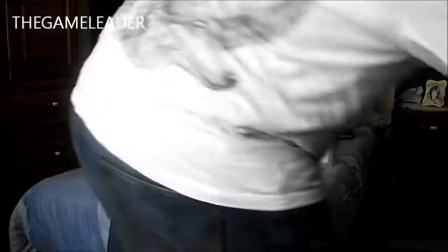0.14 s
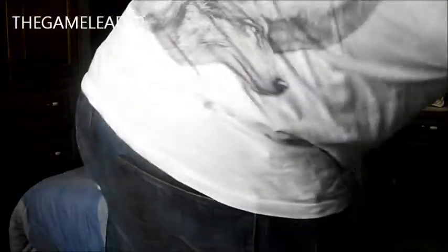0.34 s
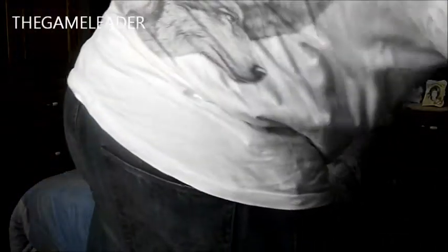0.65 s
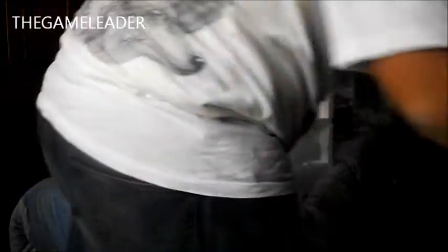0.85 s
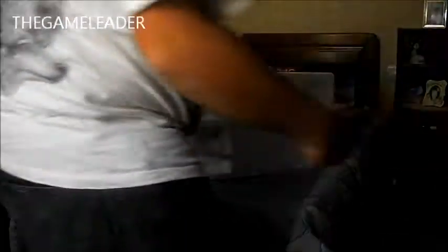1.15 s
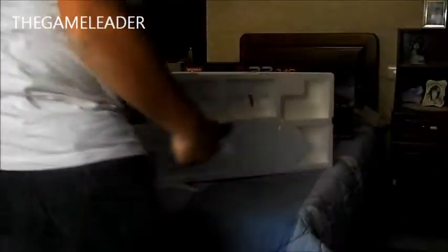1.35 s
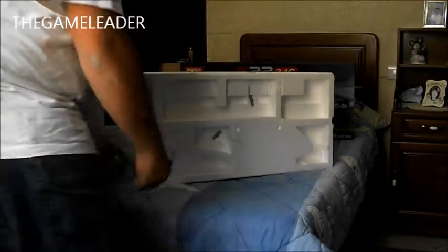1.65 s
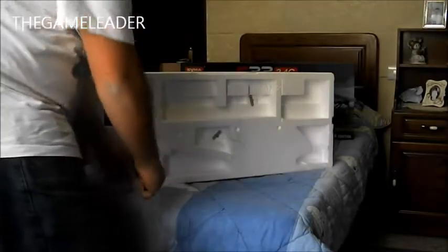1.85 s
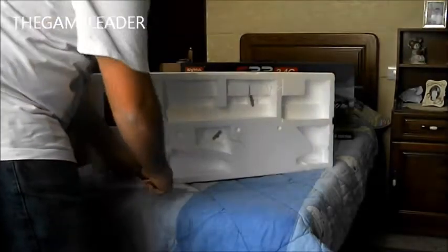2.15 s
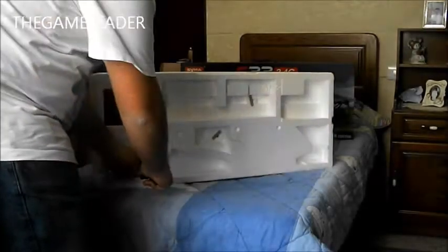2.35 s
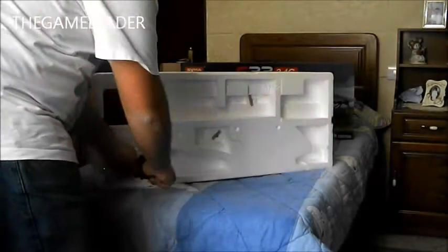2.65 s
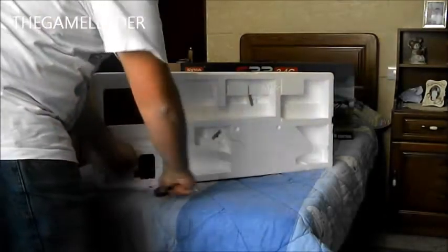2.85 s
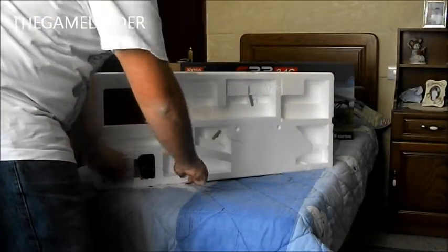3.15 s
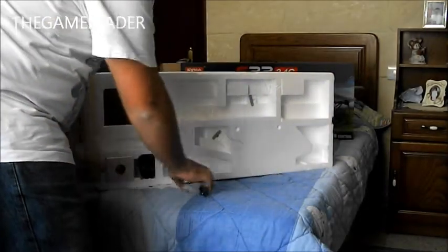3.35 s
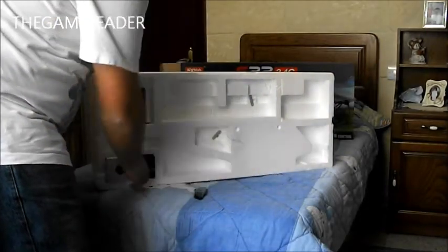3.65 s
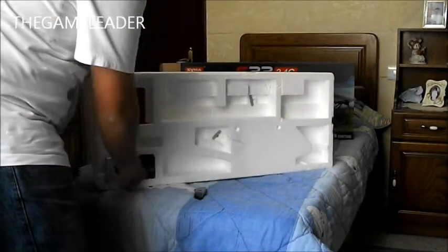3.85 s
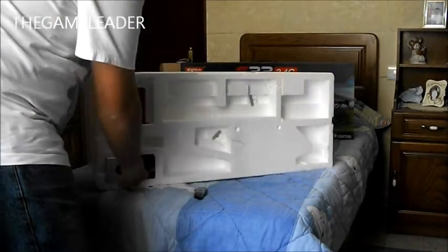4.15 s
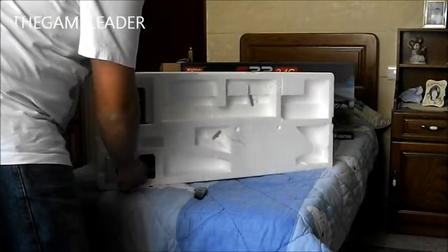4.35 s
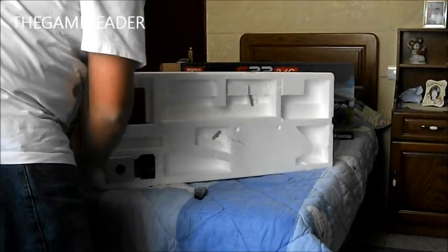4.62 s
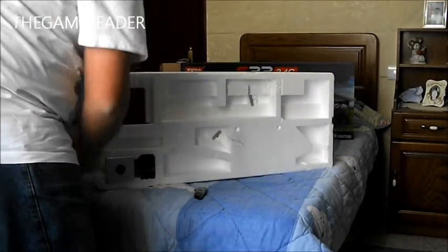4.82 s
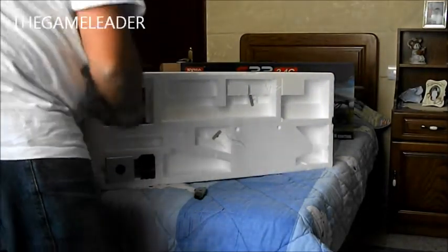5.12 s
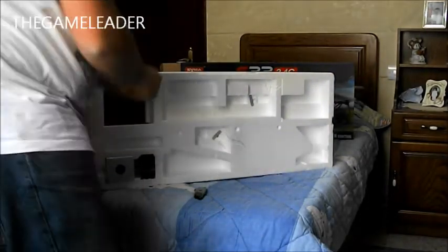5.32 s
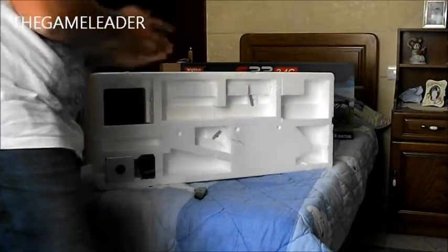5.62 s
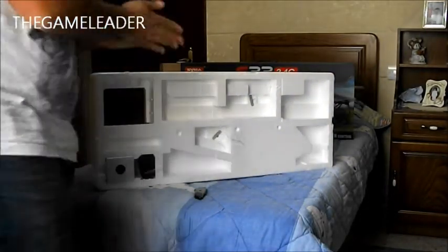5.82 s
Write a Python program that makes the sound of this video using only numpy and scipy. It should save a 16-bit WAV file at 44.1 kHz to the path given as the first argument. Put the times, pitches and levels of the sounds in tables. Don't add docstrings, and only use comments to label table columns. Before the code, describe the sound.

Hard plastic parts clack and ring, foam packaging knocks, squeaks and scrapes, then wrapping crackles in a small hissy bedroom.

```python
import sys
import numpy as np
from scipy import signal
from scipy.fft import rfft, irfft, next_fast_len
from scipy.io import wavfile
from scipy.ndimage import map_coordinates

SR = 44100
rng = np.random.default_rng(int(sys.argv[2]) if len(sys.argv) > 2 else 0)


def natural_amplitude(level_db):
    exponent = np.asarray(level_db, float) / 20
    return 10 ** exponent


def output_pcm(signal):
    pcm = np.clip(np.atleast_2d(signal).T, -1, 1) * 32767
    wavfile.write(sys.argv[1], SR, np.round(pcm).astype(np.int16))


N = 263530
UNEVEN_DB = 1.1


def unit(x):
    return x / np.sqrt(np.mean(x ** 2) + 1e-20)


def peak(x):
    return x / np.abs(x).max()


def noise():
    return rng.standard_normal(N)


def along(points, hz):
    f, v = np.transpose(points)
    return np.interp(np.log(hz + 1), np.log(f + 1), v)


def curves(rows):
    s, *cols = np.transpose(rows)
    return [np.interp(np.arange(N) / SR, s, c) for c in cols]


def wobble(rate):
    knots = rng.standard_normal(int(N * rate / SR) + 4)
    return map_coordinates(knots, [np.arange(N) * rate / SR])


def filtered(x, response):
    m = next_fast_len(len(x) + 4096)
    return irfft(rfft(x, m) * response(np.fft.rfftfreq(m, 1 / SR)), m)[:len(x)]


def band(centre_hz, width_hz):
    return lambda f: 1j * f * width_hz / (centre_hz ** 2 - f * f + 1j * f * width_hz)


def steep(centre_hz, width_hz):
    return lambda f: band(centre_hz, width_hz)(f) ** 2


def modes(table):
    def response(f):
        return sum((-1) ** k * natural_amplitude(db) * band(c, w)(f) for k, (c, w, db) in enumerate(table))
    return response


def add(track, s, x):
    part = track[round(s * SR):][:len(x)]
    part += x[:len(part)]


def burst(t, t60):
    return rng.standard_normal(len(t)) * natural_amplitude(-60 * t / t60)


def shape(s, attack, hold, t60):
    t = (np.arange(N) / SR - s).clip(0)
    return (1 - np.exp(-t / abs(attack))) * natural_amplitude(-60 * (t - hold).clip(0) / abs(t60))


def grains(rate, smooth):
    clicks = rng.random(N) < rate / SR * natural_amplitude(4 * wobble(40))
    return unit(unit(clicks * noise()) + smooth * noise())


# (middle [s], half length [s], sub level [dB], hum level [dB])
SHIFTS = [(0.2, 0.08, -56, -57), (0.41, 0.04, -44, -74), (0.523, 0.27, -80, -51), (1.071, 0.11, -65.5, -44),
          (1.458, 0.0314, -48, -70.5), (1.66, 0.083, -59, -66), (2.258, 0.021, -47, -37),
          (2.873, 0.062, -42, -39), (3.297, 0.046, -37.5, -47), (3.66, 0.16, -47, -57),
          (3.766, 0.03, -56, -40.5), (3.94, 0.035, -55, -73), (4.24, 0.082, -38, -44),
          (4.43, 0.061, -49, -91.5), (4.887, 0.066, -56, -89), (5.317, 0.087, -45, -63),
          (5.51, 0.07, -66, -59), (5.646, 0.091, -70, -52), (5.8, 0.089, -69, -50.5),
          (5.97, 0.034, -48, -36)]
# (frequency [Hz], width [Hz], level [dB])
BOX = [(105, 10.5, 4), (176.2, 28, 1.5), (277, 19.3, 0), (350, 49, -3.5), (527, 173, -4)]


def bed():
    t = np.arange(N) / SR
    sub_gain, hum_gain = natural_amplitude(-58.5), natural_amplitude(-54)
    for s, half, sub_db, hum_db in SHIFTS:
        swell = np.exp(-((t - s) / half) ** 2)
        sub_gain = sub_gain + natural_amplitude(sub_db) * swell
        hum_gain = hum_gain + natural_amplitude(hum_db) * swell
    sub = unit(filtered(noise(), steep(47.3, 19.0)))
    hum = unit(filtered(noise(), lambda f: modes(BOX)(f) * band(105, 90)(f)))
    sub_lumps, hum_lumps = 2 * wobble(14), 2 * wobble(12)
    return natural_amplitude(-4.5 + sub_lumps) * sub_gain * sub + natural_amplitude(-5.5 + hum_lumps) * hum_gain * hum


# (frequency [Hz], level per Hz [dB])
HISS = [(18, -14.5), (33, -24.5), (323, -27), (560, -28.5), (5360, -37), (6530, -36), (7510, -41.5),
        (15500, -44)]
# (frequency [Hz], rms level [dB])
WHINE = [(6783, -60.5), (13593, -65)]


def camera():
    hiss = unit(filtered(noise(), lambda f: natural_amplitude(along(HISS, f))))
    out = natural_amplitude(-52 + 0.34 * wobble(3.55)) * hiss
    t = np.arange(N) / SR
    for hz, db in WHINE:
        gain = np.sqrt(2) * natural_amplitude(db + 0.64 * wobble(90))
        out = out + gain * np.sin(2 * np.pi * hz * t + 2.1 * wobble(30))
    return out


# (time [s], peak [dB], board level [dB], box level [dB], top level [dB])
KNOCKS = [(0.0441, -50, 12, -4, -18), (0.084, -17.5, -11.5, -8, -21), (0.113, -8.5, -30, -40, 0),
          (0.9594, -37, -28, -26, -4.5), (0.9863, -38.5, -4, 9, -7), (2.0489, -31.5, -7.5, -13, -9),
          (2.112, -43.5, 11.5, 14.5, -27), (2.1552, -21, -32, -11, -9), (2.1991, -10, -18, -8.5, -32),
          (2.2192, -8, -3.5, -13.5, -25.5), (2.2274, -10.5, -24, -5, -29), (2.421, -21.5, -27.5, -29, -34),
          (2.5297, -24.5, -2, -45.5, -36.5), (2.8138, -9, 6, -14.5, -18.5), (3.083, -23.5, -8.5, -29, -44),
          (3.7452, -26.5, -14, -5, -32), (4.1874, -34.5, -6, -30.5, -24.5), (4.3343, -41, 1.5, 6.5, -31)]


def knocks():
    out, t = np.zeros(N), np.arange(SR // 6) / SR
    for s, db, board_db, box_db, top_db in KNOCKS:
        snap = peak(filtered(burst(t, .007), lambda f: band(4100, 5200)(f) ** 3))
        board = peak(filtered(burst(t, 0.039), steep(1330, 2650)))
        box = peak(filtered(burst(t, 0.0055), modes(BOX[1:])))
        tick = peak(filtered(burst(t, 0.00107), steep(15000, 7800)))
        body = natural_amplitude(board_db) * board + natural_amplitude(box_db) * box
        add(out, s, natural_amplitude(db) * (snap + body + natural_amplitude(top_db - 31.5) * tick))
    return out


# (time [s], pitch [Hz], level [dB])
SQUEAK = [
    (.102, 4900, -59.5),
    (.1045, 4440, -27.5),
    (.108, 3963, -16),
    (.12, 3906, -19.5),
    (.135, 3795, -22),
    (.157, 4200, -30),
    (.16, 3900, -62),
]


def squeak():
    hz, db = curves(SQUEAK)
    phase = 2 * np.pi * np.cumsum(hz * (1 + 0.052 * wobble(500))) / SR
    tone = np.sin(phase) + natural_amplitude(db + 15.0) * np.sin(2 * phase)
    return natural_amplitude(db + 3.2 * wobble(287.2)) * (db > -59.5) * tone


# (time [s], peak [dB], pitch [Hz], time to fall 60 dB [s])
THUMPS = [
    (0.111, -33, 177, 0.09),
    (0.985, -26.5, 176, 0.139),
    (2.217, -18.5, 353, 0.045),
    (3.614, -33, 197, 0.5),
    (3.691, -39, 105, 0.28),
    (3.748, -40, 249, 0.14),
    (3.931, -41, 276, 0.72),
    (4.17, -46, 98, 0.3),
    (4.339, -39, 326, 0.113),
    (5.238, -40, 169, 0.51),
]


def thumps():
    out, t = np.zeros(N), np.arange(SR // 4) / SR
    for s, db, hz, t60 in THUMPS:
        push = filtered(burst(t, t60), lambda f: modes(BOX)(f) * steep(hz, 160)(f))
        add(out, s, natural_amplitude(db) * peak(push))
    return out


# (time [s], time to fall 60 dB [s], skin level [dB], board share [dB], fizz share [dB])
FLICKS = [(0.112, 0.12, -20.5, -29, 0), (0.201, 1, -42.5, 4, -4.5), (1.027, 0.3, -43.5, -16, 16),
          (1.449, 0.26, -22, -26, 7.5), (0.402, 0.41, -52.5, 4, 5.5), (1.218, 1, -41.5, 1, -19),
          (0.742, 0.13, -46, -16, -8), (0.958, 0.25, -43.5, -20, -2), (0.989, 0.17, -42.5, -12, -1),
          (1.38, 0.56, -48.5, -10, -11.5), (1.72, 1, -55.5, 2.5, -18), (1.92, 0.65, -57.5, 5, -9),
          (2.151, 0.26, -33.5, -1, 4.5), (2.218, 0.16, -20.5, 2.5, -23), (3.269, 0.32, -35.5, -16, -1.5),
          (3.502, 0.3, -31.5, -8, 3), (3.94, 0.15, -38, -5, -7), (4.44, 0.26, -50, -9, 1),
          (5.51, 0.33, -40, -20, 8)]
# (time [s], length [s], skin level [dB], board share [dB], fizz share [dB])
DRAGS = [(0.606, 0.04, -52.5, 1.5, -1), (2.078, 0.14, -49, -1, -7), (2.523, 0.013, -40.5, -5, -4),
         (2.54, 0.28, -30, -6.5, -7), (2.813, 0.045, -24.5, -1, -36.5), (2.864, 0.048, -22.5, -0.5, -29),
         (3.788, 0.11, -41.5, -3.5, 1.5), (3.914, 0.15, -39, -4.5, 1), (4.182, 0.1, -48, -5.5, -0.5)]
# (frequency [Hz], width [Hz], level [dB])
CELLS = [(760, 7.7, -34), (1043, 51, 1), (1560, 76, -16), (2700, 110, -24), (3960, 820, -14)]
# (frequency [Hz], level per Hz [dB])
FOAM = [(4000, -34), (5500, 8), (6600, 5.5), (8500, -1), (11000, 2.5), (15500, -9.5)]


def strokes():
    slips = grains(3000, smooth=1.28)
    pockets = lambda f: 1 + 3 * modes(CELLS)(f)
    skin = unit(filtered(slips, lambda f: pockets(f) * abs(band(4000, 4500)(f)) ** 3))
    wall = unit(filtered(slips, lambda f: pockets(f) * abs(band(2100, 3000)(f)) ** 3))
    board = unit(filtered(noise(), lambda f: pockets(f) * steep(600, 1100)(f)))
    fizz = unit(filtered(slips, lambda f: natural_amplitude(along(FOAM, f))))
    rubs = [(shape(s, 0.0016, 0, t60), *levels) for s, t60, *levels in FLICKS]
    rubs += [(shape(s, 0.0075, length, 0.29), *levels) for s, length, *levels in DRAGS]
    out = np.zeros(N)
    for stroke, db, board_db, fizz_db in rubs:
        wall_db = -4.5 - 0.469 * fizz_db
        foam = skin + natural_amplitude(wall_db) * wall + natural_amplitude(board_db) * board + natural_amplitude(fizz_db) * fizz
        out += natural_amplitude(db) * stroke * foam
    return natural_amplitude(-6.0 + UNEVEN_DB * wobble(29.84)) * out


# (time [s], peak [dB], middle ring [Hz], low ring level [dB], high ring level [dB])
CLACKS = [(0.118, -12, 3830, -9.5, -27), (0.6636, -21.5, 4270, -17, -35), (1.0165, -25, 4400, -30.5, -7),
          (1.0248, -5, 3750, -10, -8), (1.09, -14, 4280, -17, -10), (1.109, -32, 4400, -18, -16.5),
          (1.1453, -22, 4200, -25.5, -21), (1.1723, -16, 4100, -11, -30), (1.2022, -15, 3740, -5.5, -10),
          (1.2187, -17.5, 3750, -9, -23), (1.4379, -11.5, 3770, -17, -19), (1.4515, 0.5, 4270, -6.5, -2.5),
          (1.4665, -6.5, 3930, -8, -22), (1.6215, -13.5, 3900, -6.5, -28), (1.636, -18.5, 4000, -5, -17),
          (3.1821, -17, 4170, -8, -3.5), (3.2634, -23.5, 4080, -1.5, -11), (3.4415, -34.5, 4300, -2, -8),
          (3.49, -24.5, 4270, -8, -6), (3.5073, -16.5, 3960, -7, -5), (3.6055, -21.5, 4300, -14.5, -5),
          (3.741, -22.5, 4000, -23, -4)]
# (frequency [Hz], width [Hz], level [dB])
PART = [(1889, 100, -3), (2087, 294, 1), (2212, 215, 3), (2570, 740, -7)]
# (frequency [Hz], width [Hz], level [dB])
RIM = [(4680, 120, -6), (5320, 74, 0), (5660, 230, 3), (6740, 50, -33), (9000, 100, -21)]


def clacks():
    out, t, long = np.zeros(N), np.arange(SR // 6) / SR, np.arange(SR // 2) / SR
    for s, db, hz, low_db, high_db in CLACKS:
        crack = peak(filtered(burst(t, .007), lambda f: band(hz + 400, 4200)(f) ** 3))
        low = peak(filtered(burst(t, 0.036), modes(PART)))
        middle_modes = [(hz, 340, 0), (0.87 * hz, 450, -9), (1.04 * hz, 380, -6)]
        middle = peak(filtered(burst(t, 0.039), modes(middle_modes)))
        high = peak(filtered(burst(t, 0.022), modes(RIM)))
        middle_db = -8 - 0.27 * high_db
        ring = natural_amplitude(low_db) * low + natural_amplitude(middle_db) * middle + natural_amplitude(high_db) * high
        add(out, s, natural_amplitude(db - 2.0) * (natural_amplitude(-1) * crack + natural_amplitude(-2.0) * ring))
        after = peak(filtered(burst(long, 1.2), steep(2290, 240)))
        add(out, s, natural_amplitude(db + low_db - 32.5) * after)
    return out


# (time [s], peak [dB], centre [Hz], brightness [dB])
SNAPS = [(2.8114, 3.5, 4400, 2), (2.8116, 0.5, 5030, 8.5), (2.8992, -14.5, 6560, -4),
         (3.6425, -30, 6000, 8), (3.6782, -22, 8000, 19), (3.7813, -29, 6500, 10), (3.926, -29, 7000, 10),
         (3.9494, -25, 7000, 14), (4.0083, -21, 7500, 14), (4.19, -38, 5500, 6), (5.316, -23, 4500, 4),
         (5.3188, -24, 4700, 9), (1.2295, -32, 8700, 0), (1.914, -40, 5000, 8)]
# (time [s], peak [dB], centre [Hz], brightness [dB])
CRACKLES = [(4.8358, -33, 3930, -2), (4.9556, -28, 4020, 6), (4.9646, -37, 3870, 6), (5.0665, -30, 3460, 6),
            (5.077, -16.5, 3890, 20), (5.1457, -30, 4020, -4), (5.1637, -37, 5450, 6),
            (5.1807, -29, 5510, 6), (5.195, -25, 4260, -1), (5.2082, -18, 5400, 8), (5.2204, -23, 4650, 6),
            (5.2264, -31, 4740, 6), (5.2404, -33, 4430, 4), (5.2789, -32, 4320, 3), (5.3018, -20, 5460, 17),
            (5.3064, -30, 4360, 6), (5.3133, -26, 4490, 1), (5.333, -29, 4270, 10), (5.3907, -25, 5490, 9),
            (5.4514, -26.5, 3640, 6), (5.458, -21, 5740, -1), (5.509, -24.5, 2920, 5),
            (5.5267, -18, 4390, 17), (5.5977, -26.5, 2620, 10), (5.6167, -21, 4130, 6),
            (5.6304, -24, 4470, 8), (5.7486, -15, 3990, 2), (5.7591, -17, 4200, -2.5),
            (5.774, -16, 5510, 6), (5.7814, -33, 4020, 2), (5.8274, -23, 4480, 0), (5.8424, -22, 4500, 6),
            (5.885, -29, 3820, 1), (5.89, -25, 4010, 6), (5.901, -24, 4640, 4), (5.9132, -17, 4240, 9),
            (5.9406, -24, 4100, 4), (5.9623, -18, 3760, 11), (5.9654, -23, 6070, -3)]


def crackles():
    out, t = np.zeros(N), np.arange(SR // 40) / SR
    for s, db, hz, bright_db in SNAPS + CRACKLES:
        click = filtered(burst(t, .0026), steep(hz, 1500 * natural_amplitude(bright_db)))
        add(out, s, natural_amplitude(db) * peak(click))
    return out


# (time [s], length [s], pitch [Hz], level [dB])
CREAKS = [
    (2.625, 0.0554, 760, -38),
    (2.63, 0.026, 1520, -40),
    (2.701, 0.048, 1532, -42),
    (3.745, 0.0155, 1364, -44.5),
    (5.825, 0.0296, 1485, -45.5),
    (5.925, 0.0296, 1534, -46.5),
]


def creaks():
    out, drift, waver = np.zeros(N), .8 * wobble(60), natural_amplitude(3.5 * wobble(90))
    for s, length, hz, db in CREAKS:
        t = np.arange(round(length * SR)) / SR
        swell = np.sqrt(np.sin(np.pi * t / length))
        phase = 2 * np.pi * hz * t + drift[round(s * SR):][:len(t)]
        add(out, s, natural_amplitude(db + 1.5) * swell * np.sin(phase))
    return waver * out


# (time [s], hold [s], time to fall 60 dB [s], level [dB], centre [Hz])
RUSTLES = [(4.737, 0.051, 0.27, -51.5, 4020), (4.778, 0.083, 0.51, -50.5, 4000),
           (4.979, 0.072, 0.23, -49, 4150), (5.065, 0.014, 0.25, -35, 5000), (5.152, 0.01, 0.47, -36, 4640),
           (5.28, 0.061, 0.258, -39.5, 4680), (5.38, 0.059, 0.18, -49, 4770),
           (5.445, 0.025, 0.35, -38, 4890), (5.496, 0.032, 0.38, -41.5, 2520),
           (5.593, .02, 0.19, -40, 2880), (5.622, 0.013, 0.19, -36.5, 4450),
           (5.745, 0.0051, 0.26, -26.5, 4400), (5.817, 0.029, 0.4, -31, 4420),
           (5.868, 0.065, .4, -34, 4235), (5.94, .04, .3, -34.5, 3600)]
# (frequency [Hz], width [Hz], level [dB])
SHEET = [(2400, 400, -33), (3600, 730, -7), (4050, 160, -26.5), (5940, 230, 6)]


def rustles():
    crumples = np.array([natural_amplitude(db) * shape(s, 0.007, hold, t60) for s, hold, t60, db, _ in RUSTLES])
    centre = np.array(RUSTLES)[crumples.argmax(axis=0), -1]
    hz, t, z = signal.stft(grains(1200, smooth=.85), SR, nperseg=256)
    hz = hz[:, None]
    at = np.minimum((t * SR).astype(int), N - 1)
    creases = steep(centre[at], 2300)(hz)
    panels = 1 + abs(modes(SHEET)(hz))
    gain = abs(creases * panels) + natural_amplitude(-12) * (hz > 1200)
    sheet = signal.istft(z * gain / np.linalg.norm(gain, axis=0), SR, nperseg=256)[1][:N]
    return natural_amplitude(-2.5 + 1.5 * UNEVEN_DB * wobble(40)) * crumples.sum(axis=0) * unit(sheet)


# (frequency [Hz], time to fall 60 dB [s])
ROOM = [(150, 0.29), (1000, 0.42), (4000, 0.34), (8000, 0.25), (14000, 0.2705)]


def room(x):
    step = SR // 5
    pieces = np.pad(x, (0, -N % step)).reshape(-1, step)
    hz, t, z = signal.stft(rng.standard_normal((len(pieces), SR // 2)), SR, nperseg=256)
    decay = natural_amplitude(-60 * t / along(ROOM, hz)[:, None])
    tails = signal.istft(z * decay, SR, nperseg=256)[1]
    tails = tails * (1 - np.exp(-np.arange(tails.shape[1]) / (.006 * SR)))
    tails = tails / np.linalg.norm(tails, axis=1, keepdims=True)
    answers = signal.fftconvolve(pieces, tails, axes=1)
    out = np.zeros(N)
    for k, answer in enumerate(answers):
        add(out, k * step / SR, answer)
    return out


WET = dict(clacks=0, knocks=1, crackles=-6.8, squeak=-4.5, strokes=-8, rustles=-4.5)
# (frequency [Hz], level [dB])
MIC = [(20, -1), (4500, 1), (6000, -2.5), (8000, -8.5), (11000, -13.5), (16000, -13.5)]


def scene():
    near = dict(knocks=knocks(), squeak=squeak() + creaks(), strokes=strokes(),
                clacks=clacks(), crackles=crackles(), rustles=rustles())
    echo = room(sum(natural_amplitude(WET[name]) * x for name, x in near.items()))
    air = sum(near.values()) + echo + bed() + thumps()
    mono = filtered(air, lambda f: natural_amplitude(along(MIC, f))) + camera()
    return np.array([mono, mono])


# (start [s], end [s])
THIN_SPELLS = [(0, .08), (1.565, 3.1)]
# (frequency [Hz], level [dB])
APART = [(60, -66), (200, -62), (380, -42), (700, -27), (2380, -12), (4400, -7), (8120, -1.5), (15000, 5)]


def thin_spells(mono):
    hz, t, z = signal.stft(mono, SR, nperseg=512)
    thin = sum((t > a) & (t < b) for a, b in THIN_SPELLS)
    dice = np.kron(rng.random((33, len(t) // 4 + 1)), np.ones((8, 4)))[:len(hz), :len(t)]
    unlucky = dice < ((hz[:, None] - 10500) / 5500).clip(0) ** 2
    weak = abs(z) < np.maximum(natural_amplitude(-66), natural_amplitude(-30) * abs(z).max(axis=0))
    z *= 1 - thin * unlucky * weak
    scrambled = z * np.exp(2j * np.pi * rng.random(z.shape))
    difference = scrambled * natural_amplitude(along(APART, hz) - 0.5)[:, None] * thin
    mid, side = signal.istft(np.array([z, difference]), SR, nperseg=512)[1][:, :N]
    return np.array([mid + side, mid - side])


def band_limit(x):
    return signal.sosfilt(signal.butter(12, 17100, fs=SR, output="sos"), x)


def record(dry):
    mono = filtered(dry[0], lambda f: f < 15850)
    offset = -0.023
    mix = np.clip(offset + thin_spells(mono), -1, 1)
    return band_limit(mix)


dry = scene()
out = record(dry)
output_pcm(out)
```